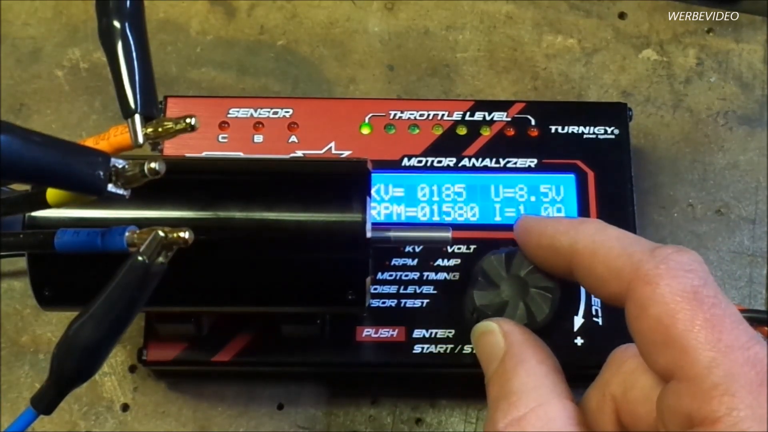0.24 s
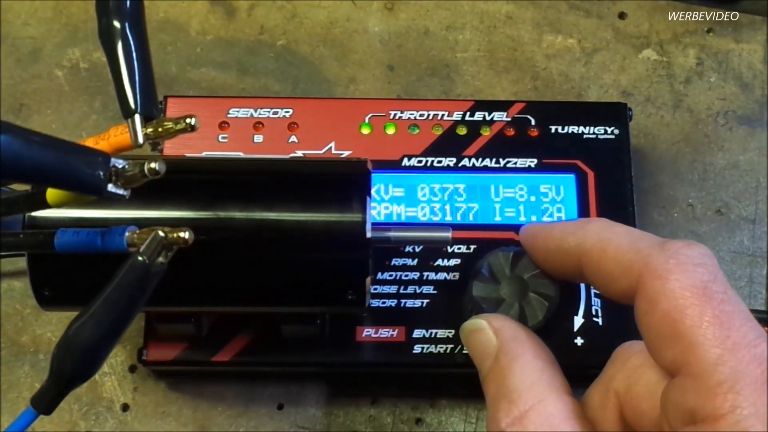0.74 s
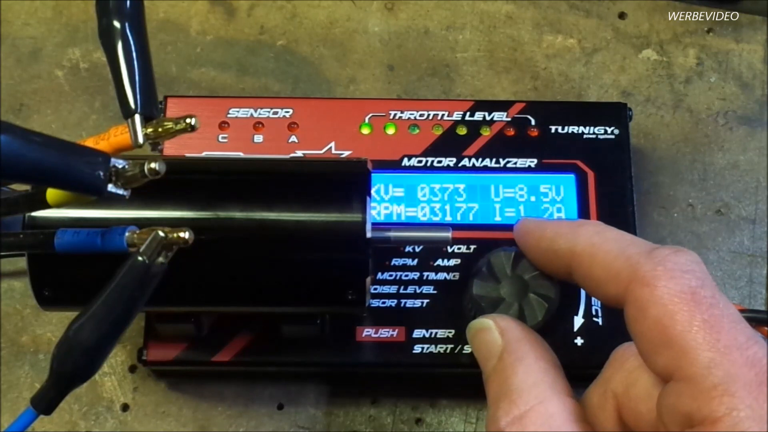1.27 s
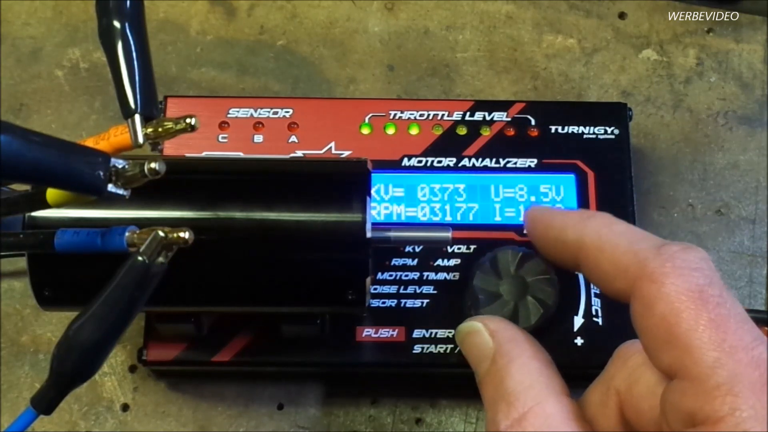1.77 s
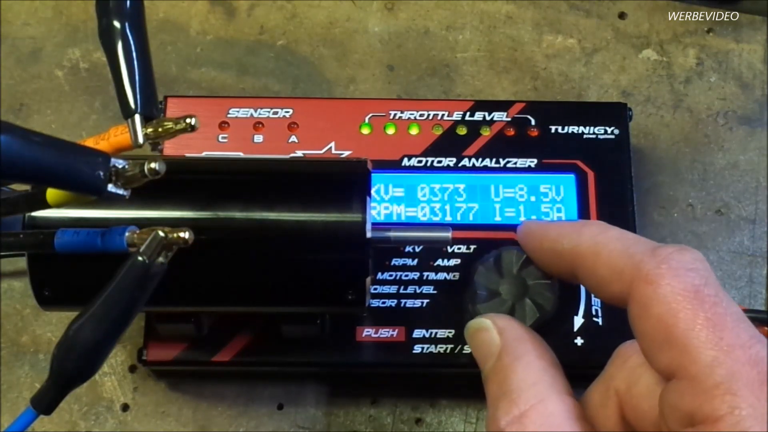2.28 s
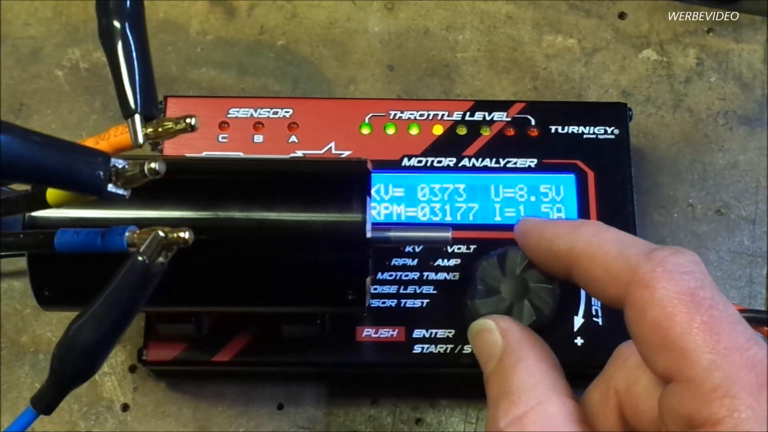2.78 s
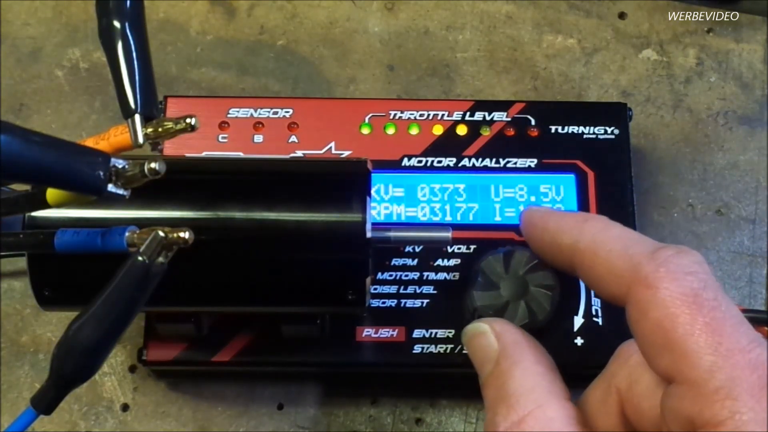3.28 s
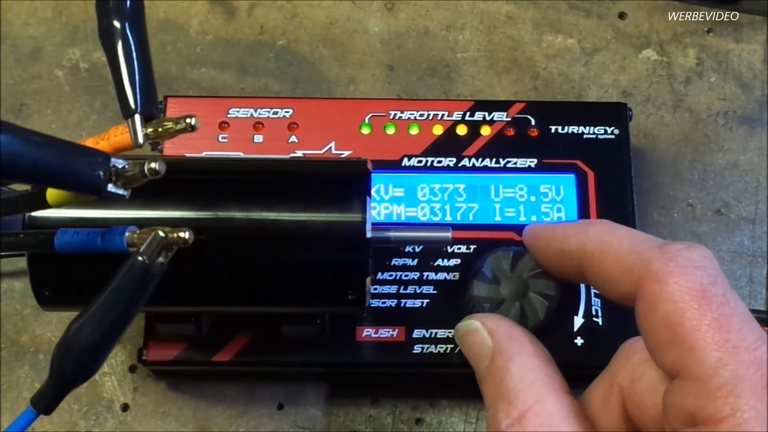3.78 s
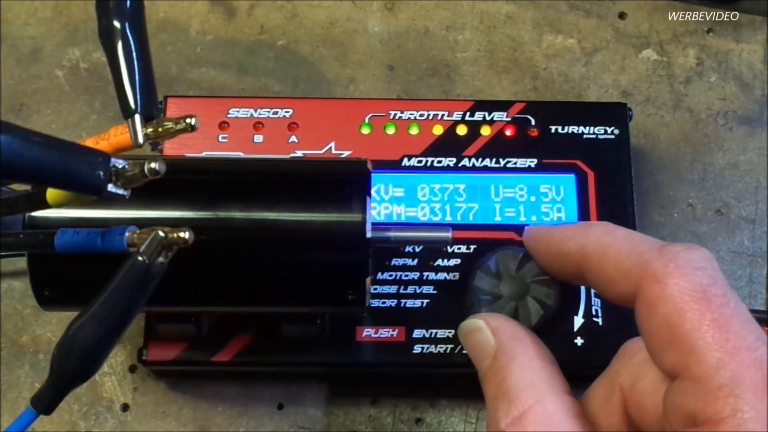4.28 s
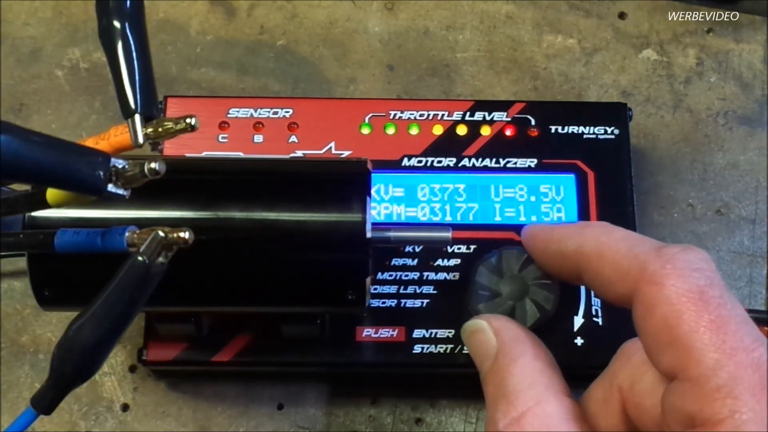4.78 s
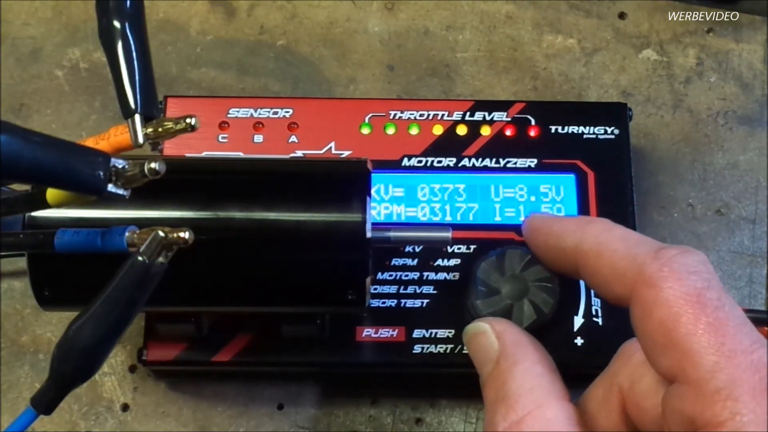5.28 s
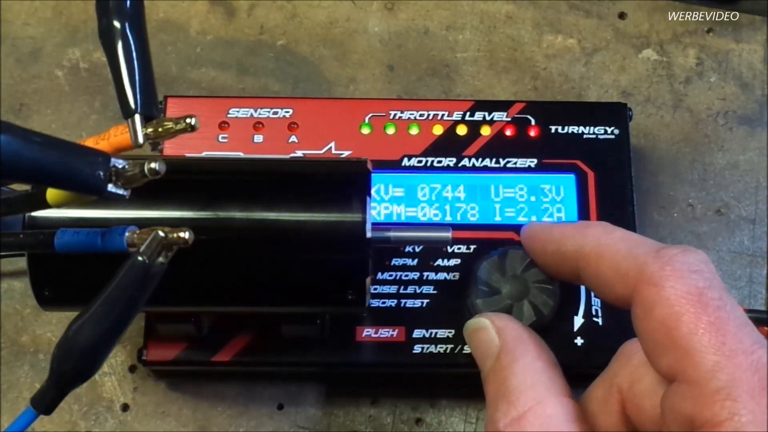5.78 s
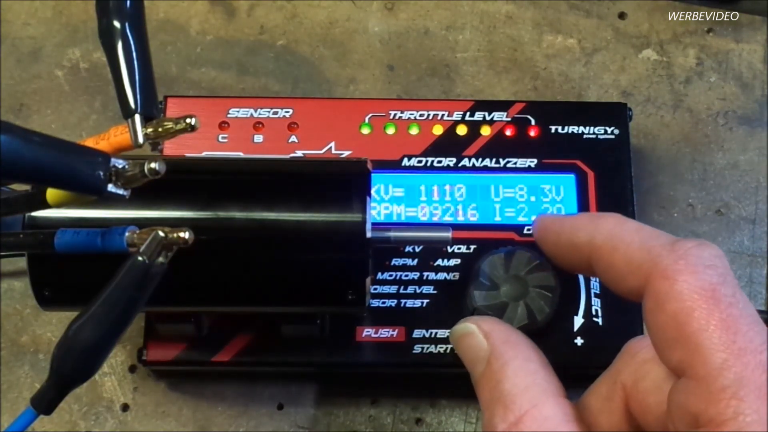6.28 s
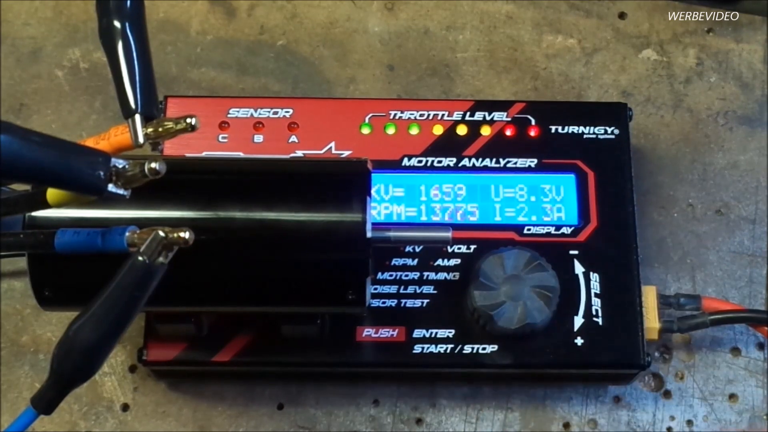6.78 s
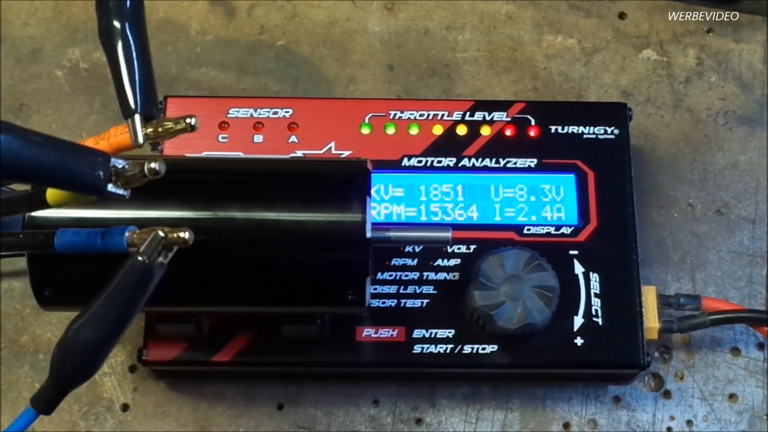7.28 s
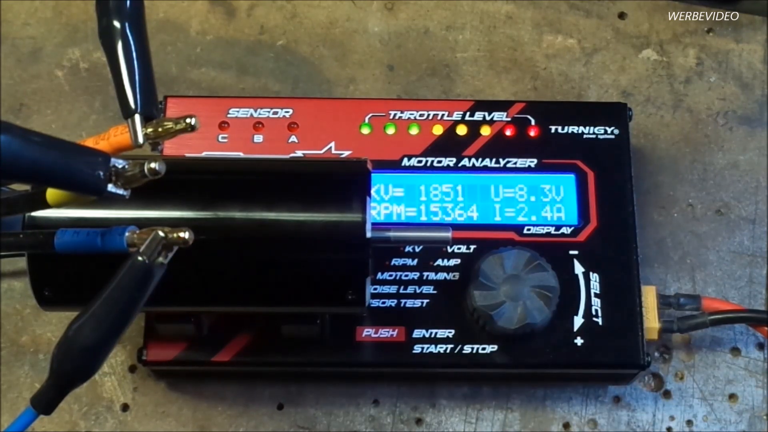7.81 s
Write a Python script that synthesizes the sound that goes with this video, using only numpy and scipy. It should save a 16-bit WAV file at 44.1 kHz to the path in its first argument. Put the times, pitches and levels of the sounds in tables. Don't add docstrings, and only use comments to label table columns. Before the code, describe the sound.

One close microphone hears a bare brushless motor spinning on a bench. A buzzy, metallic whine holds steady, climbs nearly an octave over several seconds with shifting ringing overtones, makes one last small rise and stays there. Bearing hum and airy hiss grow slightly underneath; a very high controller tone stays fixed, then fades away. The quiet workshop adds hiss and barely audible low rumble. No stop or clicks.

```python
import sys
import numpy as np
from scipy import signal
from scipy.fft import rfft, irfft, next_fast_len
from scipy.io import wavfile
from scipy.ndimage import uniform_filter1d

SR = 44100
rng = np.random.default_rng(int(sys.argv[2]) if len(sys.argv) > 2 else 0)


def unload_wav(signal):
    wavfile.write(
        sys.argv[1],
        SR,
        np.round(np.clip(np.atleast_2d(signal).T, -1, 1) * 32767).astype(np.int16),
    )


def volts_from_db(level):
    exponent = np.asarray(level, float) / 20
    return 10 ** exponent


N = 355005
T = np.arange(N) / SR
HZ = np.fft.rfftfreq(next_fast_len(N + SR), 1 / SR)

# [t/s, shaft speed f/Hz]
SHAFT_SPEED = [(0.0, 133.58), (0.23, 135.02), (0.55, 133.92), (0.78, 134.26), (0.88, 140.08),
               (1.39, 180.63), (1.51, 187.64), (1.72, 190.6), (2.18, 211.87), (2.5, 222.63), (3.06, 232.74),
               (3.6, 239.3), (4.7, 248.6), (5.35, 251.95), (5.45, 253.9), (6.48, 257.23), (6.93, 267.01),
               (8.05, 266.9)]
THROTTLE_STEPS = (0, .5, .8, 1)

# [order, level/dB at each throttle step]
PULL = [(11.0, -51.3, -47, -41.5, -45), (12.0, -62.5, -51, -47, -49), (13.0, -59.5, -53, -54.9, -40.5),
        (8.0, -74, -77, -74, -54)]
# [order, level/dB at each throttle step]
UNEVEN_SLOTS = [(6, -90, -88, -82, -66), (7, -90, -88, -82, -82), (9, -83, -76.5, -78, -84),
                (10, -88, -85, -95, -95)]
# [order, level/dB at each throttle step]
ROTOR_DRIVE = [(1.0, -73.5, -66.5, -51.4, -54.5), (2.575, -76, -71, -67, -53.5),
               (4.0, -72, -67.5, -50, -55.5)]
# [order, level/dB at each throttle step]
OVERTONES = [(21.96, -69.5, -72, -64, -60), (22.98, -48, -51.5, -65, -62), (24.1, -65, -78.6, -70, -70.1),
             (26.0, -78, -76, -60.5, -70)]
# [order, level/dB at each throttle step]
BALL_OVERTONE = [(39.85, -87, -78, -66.5, -71)]
# [order, level/dB at half speed, level/dB at full speed]
FAINT = [(18.71, -90, -80), (20, -92, -78), (26.5, -87, -81), (27, -82, -91), (28, -82, -86),
         (30.92, -83, -76), (32, -87, -86), (35, -74, -94), (35.33, -88, -89), (36, -85, -85),
         (38.85, -86, -84), (40.85, -87, -79), (42.29, -86, -86), (43.29, -87, -78), (44.29, -84, -83),
         (45.29, -86, -81), (48.71, -88, -82), (49.71, -88, -80), (51.12, -91, -84), (53, -80, -100),
         (57.17, -86, -88), (71.5, -81, -150), (78.5, -83, -150)]

# [f/Hz, width/Hz, level/dB over the plain path]
CAN = [(1802, 40, 25.1), (1940, 196, 6), (3470, 45, 15.6)]
# [f/Hz, width/Hz, level/dB over the plain path]
END_BELLS = [(1805, 50, 11), (7150, 250, 17), (9500, 300, 15), (10550, 350, 14)]
# [f/Hz, width/Hz, level/dB]
PATH_LOW = [(163.5, 11.7, -7), (178.7, 12, 8), (218.4, 5.3, -6), (245.9, 7, -8.3), (528, 30.4, 7.5),
            (628, 24.7, -11.5), (797.4, 56.8, 2), (923, 73, -8), (958.3, 19, 4.5)]
PATH_MID = [(1205.5, 43.9, 7.6), (1320.6, 97.6, -7.0), (1422.1, 34.6, 5.6), (1573, 53.7, -6),
            (1812.5, 92, 5), (1850.7, 6.2, -5), (1986, 94, 8), (2129.9, 48, -8.5), (2201.5, 140, 5),
            (2348.7, 14, -6.5), (2620, 113, -8.5), (2830, 13.6, -6.0), (3105, 26, -6.5), (3364, 186, -25.5)]
PATH_HIGH = [(3052, 88.7, 7.6), (3082.5, 166.8, -15), (3310, 84.1, -20), (3527.7, 89, 5),
             (3823.3, 97.7, -2), (4238.6, 88, -11), (4574, 81.2, -10), (4860, 370, 5), (5296.2, 22, -4.2),
             (5700, 159.4, 3), (5860, 64.5, -6.5), (6420, 101.6, 4.5), (6720, 45.7, 3.6),
             (6886.4, 40.2, -9.7)]
PATH_TOP = [(9470, 250, 6.6), (10000, 200, 2)]
# [order, f/Hz, width/Hz, level/dB]
ALONE_MID = [(11.0, 1862.9, 29.0, -10.5), (11.0, 2027.2, 33.2, -5), (11.0, 2116.3, 70, 7.9),
             (12.0, 1571.8, 67.9, 9), (12.0, 1908.4, 28.4, -9), (12.0, 1987.7, 34.5, 7),
             (12.0, 2062.0, 24.4, -11.5), (12.0, 2617.4, 26.0, -11), (12.0, 2711.9, 42.9, -3),
             (13.0, 1864.9, 27, 6.5), (13.0, 1976.4, 24.2, -6), (13.0, 2064.1, 30.7, -10.4),
             (13.0, 2141.1, 31.1, 12.6), (13.0, 2175.0, 36.5, -10), (13.0, 2596.2, 110, 9),
             (13.0, 3040.1, 29.7, -7)]
ALONE_HIGH = [(22.0, 3313.9, 96.8, 11), (22.0, 4735.4, 133.9, -5), (23.0, 3650, 220, -9),
              (23.0, 5318.1, 36.8, -12), (23.0, 5701.5, 63.4, -14), (24.0, 3789.9, 81.9, 5),
              (24.0, 4400, 106.6, -10.0), (26.0, 6044.1, 115.3, -12)]
ALONE_FINE = [(8, 1765, 30, 2), (8, 1890, 54, 2), (8, 1850, 9.1, 2.5), (11, 1845, 16, 5.5),
              (11, 1868, 9.3, -7), (12, 2940, 78, 2), (12, 3160, 14, 5), (12, 3184, 9, -14),
              (13, 1800, 33, 1.5), (13, 2600, 14, -5), (13, 3040, 8, -6), (13, 3415, 17, -4),
              (23, 3000, 60, -6), (23, 3490, 31, 7), (23, 4560, 50, -7), (23, 5700, 230, 2.5)]
ALONE_SLOTS = [(6, 1600, 30, -8), (7, 1875, 30, -10), (9, 1700, 70, -10), (9, 2020, 50, 6)]

# [octaves over half speed, level/dB]
SWITCHING = [(0, -64), (.2, -61.5), (.7, -65), (.85, -65.5), (.94, -72), (.99, -95)]
# [f/Hz, level/dB per Hz]
WHIRR = [(60, -23.5), (200, -8.5), (500, -6), (1000, 0.5), (2000, -5), (3000, -7.5), (4500, -8),
         (7000, -15), (12000, -12)]
# [f/Hz, width/Hz, level/dB over the plain path]
BENCH = [(120, 25, 14), (300, 50, 10), (558, 36, 16), (925, 80, 10), (1800, 60, 14), (1802, 14, 20),
         (2020, 200, 4), (3460, 60, 8), (4400, 500, 0), (7100, 300, 2), (10500, 900, 4), (12200, 700, 2)]
# [f/Hz, level/dB per Hz]
HISS = [(15, -2), (50, -11.5), (120, -8), (300, -5), (1000, -5), (2000, -4.5), (3500, -8.5), (6000, -10.5),
        (8500, -11), (11500, -9), (13500, -15), (15500, -12.5)]
# [t/s, half length/s, level/dB]
RUMBLE = [
    (.15, .15, 7.5),
    (1.8, .15, 6),
    (3.6, .35, 13),
    (4.23, .14, 11),
    (4.9, .4, 7),
    (7.75, .3, 8),
]
# [t/s, length/s]
WIDE_SPLITS = [
    (1.02, .14),
    (1.58, .07),
    (2.23, .21),
    (4.24, .03),
    (4.49, .03),
    (5.28, .08),
    (6.05, .06),
    (6.29, .12),
    (7.45, .05),
]
# [t/s, length/s, center f/Hz]
NARROW_SPLITS = [(.16, .02, 9300), (.28, .02, 9600), (.42, .02, 10900), (.49, .02, 4650), (.6, .02, 4650),
                 (.91, .02, 11700), (1.46, .02, 9300), (2.81, .02, 11700), (3.85, .05, 12000),
                 (4.67, .05, 11600), (4.83, .05, 10600), (5.04, .02, 4700), (5.22, .02, 4700),
                 (7.01, .02, 13000), (7.24, .05, 13200), (7.64, .02, 5100)]


def evened(x):
    return x / np.sqrt(np.mean(x ** 2))


def curve(rows, axis=1):
    rows = np.array(rows)
    return np.interp(T, rows[:, 0], rows[:, axis])


def filtered(x, gain):
    size = next_fast_len(N + SR)
    return irfft(rfft(x, size) * gain, size)[:N]


def modes(table, sign=1):
    total = 1
    for k, (f, width, db) in enumerate(table):
        total = total + sign ** k * volts_from_db(db) * width * f / (f * f - HZ ** 2 + 1j * width * HZ)
    return total


def shape(points):
    f, db = np.transpose(points)
    return volts_from_db(np.interp(np.log(HZ + 1), np.log(f), db))


def drift(hz):
    at = np.arange(0, T[-1] + 1, 1 / hz)
    steps = np.interp(T, at, rng.standard_normal(len(at)))
    return evened(uniform_filter1d(steps, int(SR / hz)))


def bumps(x, rows):
    return sum(db * np.exp(-((x - at) / width) ** 2) for at, width, db in rows)


def orders(speed, turns, rows, path, flutter_db, alone=()):
    step = 64
    slow = speed[::step]
    throttle = np.log2(slow / 134)
    tones = []
    for order, *drive_db in rows:
        if abs(order - round(order)) < .1:
            order = round(order)
        own = [row[1:] for row in alone if round(row[0]) == order]
        level_db = np.interp(throttle, THROTTLE_STEPS, drive_db) + bumps(order * slow, path + own)
        level = volts_from_db(np.interp(T, T[::step], level_db) + flutter_db * drift(40))
        tones.append(level * np.sin(2 * np.pi * (order * turns + rng.random())))
    return tones


def faint_orders(speed, turns):
    throttle = np.log2(speed / speed[0])
    tones = 0
    for order, slow_db, fast_db in FAINT:
        level_db = slow_db + (fast_db - slow_db) * throttle + 2.0 * drift(6) + 2.0 * drift(50)
        tones = tones + volts_from_db(level_db) * np.sin(2 * np.pi * (order * turns + rng.random()))
    treble_loss = np.sqrt(1 + (HZ / 11500) ** 16)
    return filtered(tones, modes(END_BELLS) / treble_loss)


def motor(speed, turns):
    can = modes(CAN, sign=-1)
    whine = orders(speed, turns, PULL, PATH_MID, flutter_db=0.57, alone=ALONE_MID + ALONE_FINE)
    whine += orders(speed, turns, UNEVEN_SLOTS, PATH_MID, flutter_db=0.7, alone=ALONE_SLOTS)
    direct = orders(speed, turns, ROTOR_DRIVE, PATH_LOW + [(1039, 16, 3.1)], flutter_db=1.0)
    direct += orders(speed, turns, OVERTONES, PATH_HIGH, flutter_db=1.5, alone=ALONE_HIGH + ALONE_FINE)
    direct += orders(speed, turns, BALL_OVERTONE, PATH_TOP, flutter_db=1.5)
    ringing = filtered(sum(whine) + faint_orders(speed, turns), can)
    order_13 = signal.hilbert(filtered(whine[2], can))
    lifted = (order_13 * np.exp(2j * np.pi * turns)).real * speed[0] / speed
    once_a_turn = np.cos(2 * np.pi * turns)
    buzz = filtered(ringing ** 2 * once_a_turn, modes(CAN[2:]) - 1)
    return ringing + sum(direct) + volts_from_db(-18.5) * lifted + volts_from_db(-10) * buzz


def controller(speed, turns):
    switch_hz = 7964.5
    main = np.sin(2 * np.pi * switch_hz * T)
    sides = volts_from_db(-14 + 3 * drift(4)) * np.sin(2 * np.pi * (switch_hz * T - 12 * turns))
    level_db = np.interp(np.log2(speed / speed[0]), *np.transpose(SWITCHING))
    return np.sqrt(2) * volts_from_db(level_db + 0.54 * drift(20)) * (main + sides)


def bearings(speed, turns):
    once_a_turn = 1 + 0.17 * np.cos(2 * np.pi * turns)
    rolling = rng.standard_normal(N) * once_a_turn * volts_from_db(0.85 * drift(14))
    ripple = uniform_filter1d(rng.standard_normal(len(HZ)), size=500)
    ripple_db = 1.2 * evened(uniform_filter1d(ripple, size=500))
    bench = np.sqrt(1 + sum(abs(modes([mode]) - 1) ** 2 for mode in BENCH))
    level_db = -54.5 + 1.5 * np.log2(speed / speed[-1])
    return volts_from_db(level_db) * evened(filtered(rolling, shape(WHIRR) * bench * volts_from_db(ripple_db)))


def workshop():
    hiss = evened(filtered(rng.standard_normal(N), shape(HISS)))
    around_60_hz = np.exp(-((HZ - 60) / 14) ** 2)
    rumble = evened(filtered(rng.standard_normal(N), around_60_hz))
    return volts_from_db(-57) * hiss + volts_from_db(-84 + bumps(T, RUMBLE)) * rumble


def nibbled(x, depth_db):
    hz, _, z = signal.stft(x, SR, nperseg=1024)
    patches = uniform_filter1d(rng.standard_normal(z.shape), size=3, axis=0)
    patches = evened(uniform_filter1d(patches, size=7, axis=1))
    treble = np.clip(hz / 5000, 0, 1)[:, None] ** 2
    gain_db = 0.83 - depth_db * np.maximum(patches - .7, 0)
    return signal.istft(z * volts_from_db(gain_db * treble), SR, nperseg=1024)[1][:N]


def splits():
    rows = [(s, length, 25, 13500, -70) for s, length in WIDE_SPLITS]
    for s, length, hz in NARROW_SPLITS:
        spread = 2 ** (10 * length / 2)
        rows.append((s, length, hz / spread, min(hz * spread, SR / 3), -73))
    out = np.zeros(N)
    for s, length, low_hz, high_hz, db in rows:
        band = signal.butter(4, [low_hz, high_hz], "band", fs=SR, output="sos")
        noise = signal.sosfilt(band, rng.standard_normal(round((length + .02) * SR)))
        at = round((s - .01) * SR)
        out[at:at + len(noise)] += volts_from_db(db) * evened(noise) * signal.windows.tukey(len(noise), .3)
    return out


def scene():
    inertia_s = .12
    speed = uniform_filter1d(curve(SHAFT_SPEED), round(inertia_s * SR), mode="nearest")
    speed = speed * (1 + 0.00021 * drift(30))
    turns = np.cumsum(speed) / SR
    tones = motor(speed, turns) + controller(speed, turns)
    noise = nibbled(bearings(speed, turns) + workshop(), depth_db=8.5)
    mono = tones + noise
    return np.array([mono, mono])


def roll_off(x):
    return signal.sosfilt(signal.butter(12, 15050, fs=SR, output="sos"), x)


def record(dry):
    mix = dry - .0005 + np.outer([1, -1], splits())
    return roll_off(mix)


dry = scene()
out = record(dry)
unload_wav(out)
```